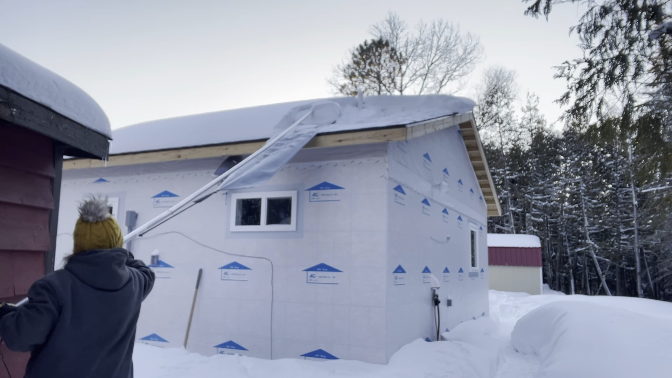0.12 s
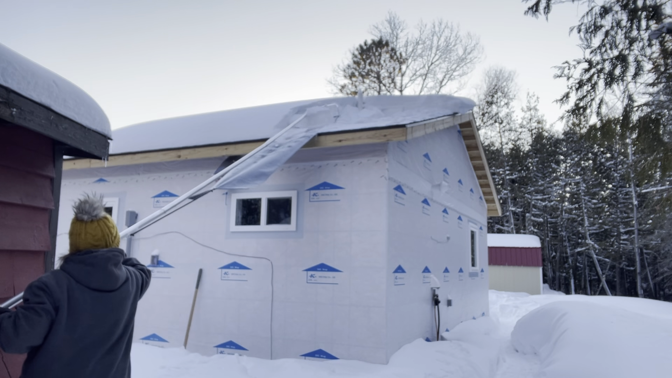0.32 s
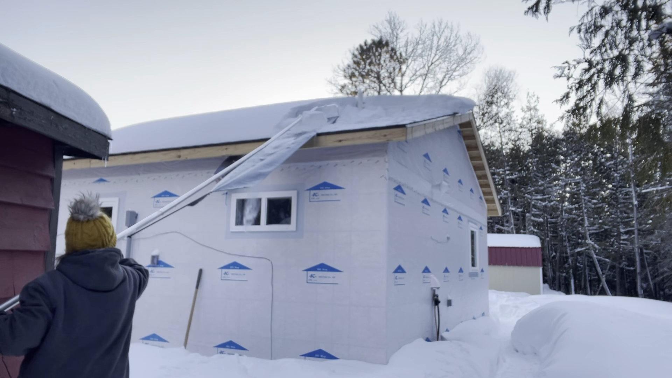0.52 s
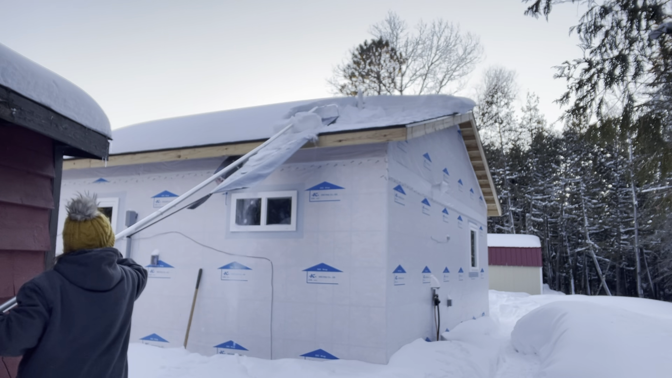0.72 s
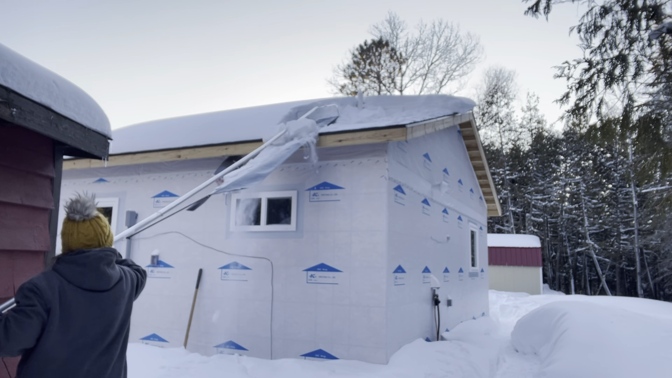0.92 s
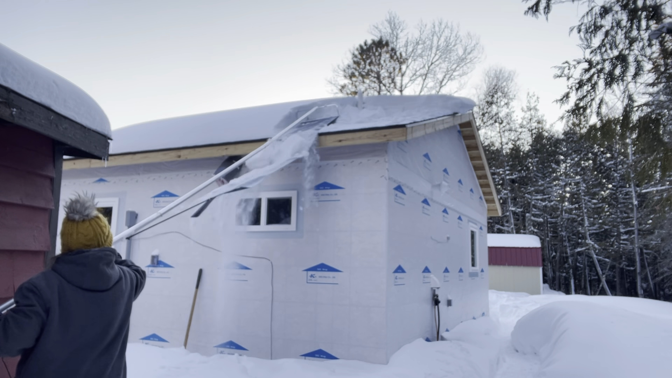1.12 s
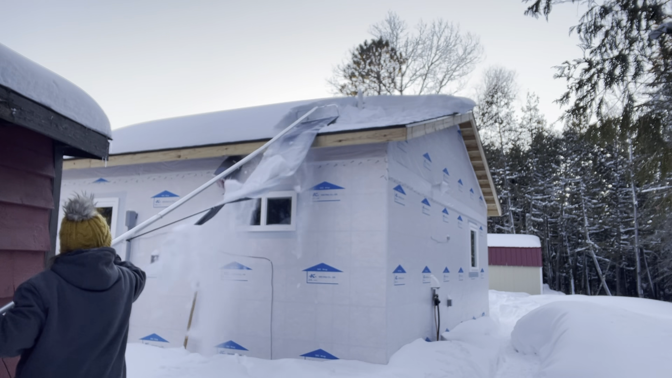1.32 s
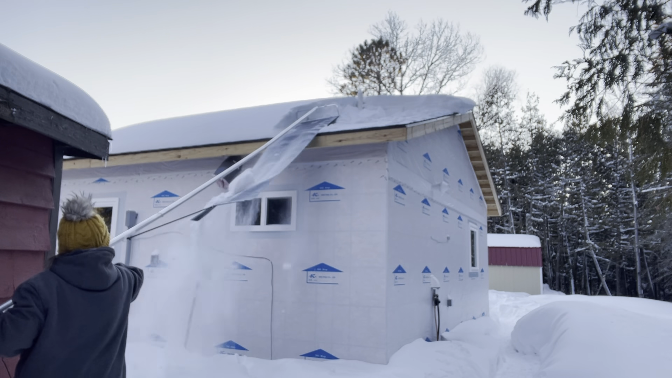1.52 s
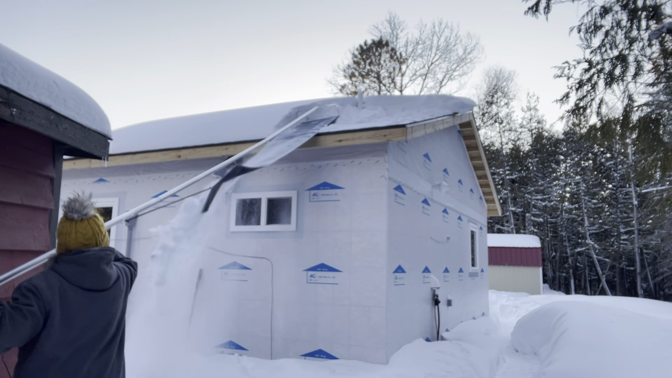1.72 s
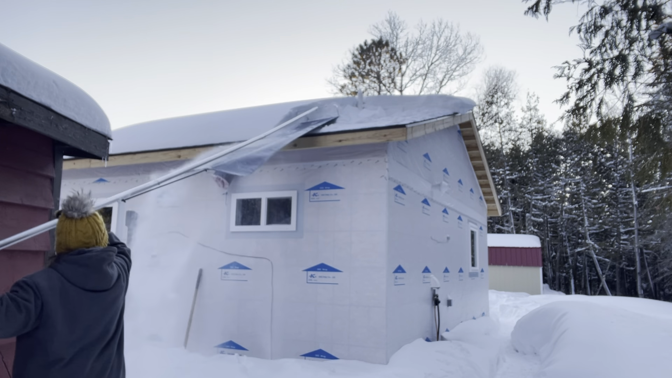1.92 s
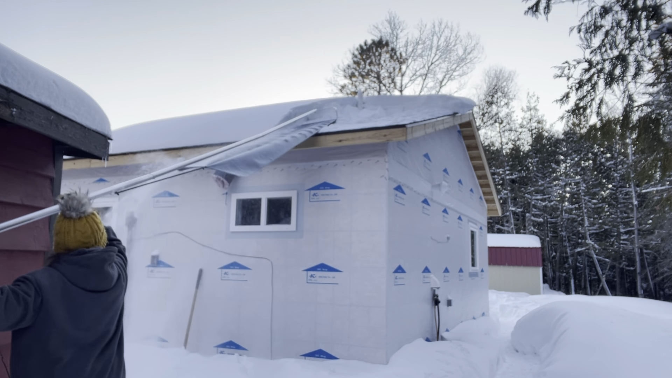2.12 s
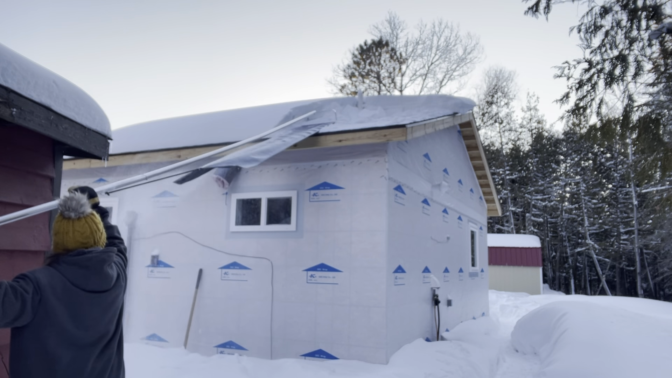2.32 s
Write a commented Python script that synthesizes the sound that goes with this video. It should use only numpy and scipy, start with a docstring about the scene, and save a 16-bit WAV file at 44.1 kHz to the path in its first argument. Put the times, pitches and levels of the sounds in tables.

```python
"""A roof rake clears deep snow in quiet winter air, no echo. The pole knocks and the blade
shears up into the snow with a scraping hiss. From about 1 s the loosened slab rushes down the
plastic tarp in a hiss of powder. Near 1.75 s the unloaded tarp flaps; the pole knocks twice more.
Loose snow pours off the eave and lumps land with low thuds and short crunches, the heaviest
at 2.1 s. The tarp scuffs faintly on the roof."""
import sys
import numpy as np
from scipy import signal
from scipy.fft import rfft, irfft, next_fast_len
from scipy.io import wavfile
from scipy.ndimage import map_coordinates

SR = 44100
rng = np.random.default_rng(int(sys.argv[2]) if len(sys.argv) > 2 else 0)


def wrap_up_sound(samples):
    """Save the sound to the file named by the first command line argument, as 16-bit audio."""
    columns = np.atleast_2d(samples).T
    # keep every value between -1 and 1, then stretch to whole-number steps
    tamed = np.clip(columns, -1, 1)
    steps = np.round(tamed * 32767).astype(np.int16)
    wavfile.write(sys.argv[1], SR, steps)


N = 108045
T = np.arange(N) / SR

# spectra (frequency [Hz], gain [dB])
AIR_TONE = [(20, -33), (45, -14), (110, 3.5), (250, -8), (500, -1), (1000, -19), (4000, -16), (15000, -36)]
POUR_TONE = [(20, -7), (55, -0.5), (130, -4), (260, -6.5), (500, -14.5), (1500, -18), (3500, -38),
             (6000, -18), (15000, -51)]
SCUFF_TONE = [(200, -36), (550, -3), (780, 5.5), (1100, -3), (1500, -8), (2200, -9), (8000, -27)]
FLAP_TONE = [(60, -29), (150, 0.5), (225, -21), (345, 4.5), (480, -6.5), (750, -6.5), (1000, -6),
             (1350, -7), (1800, -12), (2050, -43), (8000, -35)]
CRUNCH_TONE = [(40, -14), (130, -4), (230, -6.5), (430, 3.5), (620, -5.5), (1400, -6.5), (2200, -15.5),
               (3500, -10.5), (5500, -39), (12000, -42)]
POWDER_TONE = [(1000, -27), (3000, -13), (5000, -8.5), (7000, -6.5), (9000, -5), (10500, -1.5), (12300, -2),
               (14500, 1.5), (15800, -0.5)]
SCRAPE_TONE = [(150, -4.5), (320, -3.5), (500, -4), (1400, -1.6), (2500, -3), (4000, -3.5), (5500, -5.5),
               (7500, -12.5), (15000, -25)]
SLIDE_TONE = [(300, -12.5), (600, -1), (780, -2.5), (1050, -2), (1700, -1.5), (2700, -5), (4000, -3.5),
              (6000, -7.5), (8000, -15), (15000, -24)]

# tarp scuffs (time [s], level [dB], width [s])
SCUFFS = [(.378, -47, 0.015), (2.287, -59, 0.022), (2.32, -56, 0.0074)]
# pole knocks (time [s], level [dB], t60 factor set by the grip [1])
KNOCKS = [(0.05, -46.5, 1.3), (1.7644, -33.5, 1.23), (1.979, -36.5, 0.73)]
# pole modes (frequency [Hz], gain [dB], base t60 [s])
POLE_MODES = [(284, -9, 0.1), (337, 4, 0.049), (425, 2, 0.036), (625, -3.5, 0.033), (1010, -8, 0.026)]
# tarp flaps (time [s], level [dB], t60 [s])
FLAPS = [(1.744, -35.5, 0.04), (1.751, -31.5, 0.058), (1.764, -31.5, 0.034)]
# lumps (time [s], thud level [dB], thud frequency [Hz], thud t60 [s],
#        crunch level [dB], crunch rise [s], crunch t60 [s])
LANDINGS = [(1.425, -57, 112, 0.09, -64, 0.012, 0.12), (1.443, -59, 65, 0.14, -67, 0.012, .1),
            (1.595, -54, 61.4, 0.18, -60, 0.011, 0.11), (1.716, -48, 70.5, 0.25, -52, 0.028, 0.17),
            (1.753, -40, 78, 0.13, -51, 0.019, 0.096), (1.789, -48, 60, 0.12, -62, 0.021, 0.31),
            (2.006, -51, 70, 0.27, -76, 0.013, 0.17), (2.058, -44.5, 107, 0.15, -64, .006, 0.11),
            (2.094, -31, 153, 0.038, -49, 0.012, 0.12), (2.105, -20, 60, 0.091, -39.5, 0.028, 0.063),
            (2.14, -37, 90, 0.12, -60, 0.0067, 0.08), (2.154, -42, 154, 0.074, -54, 0.0037, .05),
            (2.174, -37.5, 56, 0.18, -58, 0.0073, 0.14)]

# loose snow envelopes (time [s], relative level [dB])
POUR_LEVEL = [(1.35, -101), (1.58, -66), (1.68, -56.5), (1.78, -56), (1.86, -66), (1.95, -67),
              (2.05, -55.5), (2.18, -55), (2.27, -66.5), (2.34, -72), (2.45, -90)]
POWDER_LEVEL = [(0.0, -50.5), (0.02, -49), (0.13, -52), (0.71, -45), (1.19, -32.5), (1.72, -37),
                (1.81, -45), (2.0, -51.5), (2.45, -58)]
# blade and slab hiss (time [s], level [dB], lower edge [Hz])
SCRAPE_CURVES = [(0, -49.5, 249), (.14, -48.5, 226), (.2, -45.5, 169), (.35, -46.5, 261), (.41, -44.5, 696),
                 (.5, -45, 1160), (.68, -43.5, 1290), (.78, -42.5, 1230), (1.05, -38.5, 980),
                 (1.35, -47, 890), (1.9, -59.5, 600)]
SLIDE_CURVES = [(0, -59.5, 1080), (.6, -47.5, 1200), (.84, -61, 824), (.92, -42.5, 704), (1.04, -42, 556),
                (1.24, -34.5, 500), (1.38, -35.5, 540), (1.46, -36.5, 520), (1.6, -37.5, 515),
                (1.69, -40, 380), (1.76, -44.5, 300), (1.82, -50.5, 404), (1.9, -55.5, 600),
                (2.05, -59, 766), (2.24, -67.5, 600), (2.33, -63, 550), (2.45, -88, 550)]
# floor below the edge (frequency [Hz], gain [dB])
SCRAPE_FLOOR = [(40, -43), (150, -16.5), (350, -13.5), (650, -7), (950, -5)]
SLIDE_FLOOR = [(40, -44), (220, -29), (330, -8), (450, -28.5)]
# stereo width (frequency [Hz], side over mid [dB])
SCRAPE_WIDTH = [(200, -9.5), (700, -7.5), (1500, -16.5), (4000, -24), (7000, 1)]
SLIDE_WIDTH = [(300, -17), (800, -7.5), (1500, -15), (2800, -3), (6000, -23)]
# hollow resonance, moving as the rake travels (time [s], centre [Hz])
SCRAPE_RESONANCE = [(0, 1190), (.22, 720), (.37, 794), (.5, 1350), (.7, 1460), (.9, 1290), (1.1, 1140)]
SLIDE_RESONANCE = [(.95, 1040), (1.15, 1120), (1.38, 980), (1.55, 1130), (1.68, 1380)]

GROUND_LEAD_S = 0.00035  # snow lands to the left


def amp(db):
    """Decibels to gain."""
    return 10 ** (np.asarray(db) / 20)


def unit(x):
    """Scale to rms 1."""
    return x / np.sqrt(np.mean(x ** 2) + 1e-20)


def along(points, hz):
    """Interpolate (frequency [Hz], value) on a log axis."""
    knots_hz, values = np.transpose(points)
    return np.interp(np.log(hz + 1), np.log(knots_hz + 1), values)


def curves(rows):
    """Per-sample curve of each column after the time."""
    times_s, *columns = np.transpose(rows)
    return [np.interp(T, times_s, column) for column in columns]


def wobble(rate_hz):
    """Smooth random curve, rate_hz knots a second."""
    return map_coordinates(rng.standard_normal(int(N * rate_hz / SR) + 4), [T * rate_hz])


def filtered(x, response):
    """Apply a complex frequency response."""
    size = next_fast_len(N + SR // 2)
    return irfft(rfft(x, size) * response(np.fft.rfftfreq(size, 1 / SR)), size)[..., :N]


def placed(x, lead_s, left_db):
    """Pan by the left channel's lead and gain over the right."""
    half = np.array([[.5], [-.5]])
    return amp(half * left_db) * filtered(x, lambda hz: np.exp(2j * np.pi * hz * half * lead_s))


def grains(tone, side_db, grain_db):
    """Noise of countless tiny, uneven contacts; side_db: number or table. Stereo, rms 1."""
    size = amp(grain_db * wobble(2000))
    mid, side = filtered(size * rng.standard_normal((2, N)), lambda hz: amp(along(tone, hz)))
    side = filtered(side, lambda hz: amp(along(side_db, hz) if np.ndim(side_db) else side_db))
    return unit(np.array([mid + side, mid - side]))


def edged(x, edge_hz, floor, order=39):
    """Steep moving high-pass with a floor below its edge; rms 1."""
    hz, frames_s, spectra = signal.stft(x, SR, nperseg=1024)
    above = 1 / (1 + (np.interp(frames_s, T, edge_hz) / (hz[:, None] + 1)) ** order)
    gain = above + amp(along(floor, hz))[:, None] * (1 - above)
    return unit(signal.istft(spectra * gain, SR, nperseg=1024)[1][:, :N])


def hollowed(x, resonance, peak_db, dip_db, width_oct, dip_ratio=0.773):
    """Moving resonance with a dip below it; rms 1."""
    hz, frames_s, spectra = signal.stft(x, SR, nperseg=1024)
    centre_hz = np.interp(frames_s, *np.transpose(resonance))
    bump = lambda at_hz: np.exp(-.5 * (np.log2((hz[:, None] + 1) / at_hz) / width_oct) ** 2)
    gain = amp(peak_db * bump(centre_hz) + dip_db * bump(dip_ratio * centre_hz))
    return unit(signal.istft(spectra * gain, SR, nperseg=1024)[1][:, :N])


def air(level_db=-72):
    """Faint, low outdoor noise."""
    return grains(AIR_TONE, side_db=-4.5, grain_db=-6) * amp(level_db + 0.87 * wobble(7.9))


def pour():
    """Loose snow patters onto the ground with a soft rumble."""
    level_db, = curves(POUR_LEVEL)
    patter = grains(POUR_TONE, side_db=-13, grain_db=5) * amp(level_db + 1.2 * wobble(35.8))
    return placed(patter, GROUND_LEAD_S, left_db=1)


def scuffs():
    """The tarp drags briefly on the roof."""
    swell = sum(amp(db) * np.exp(-.5 * ((T - at_s) / width_s) ** 2) for at_s, db, width_s in SCUFFS)
    return placed(swell * grains(SCUFF_TONE, side_db=-10, grain_db=3.5), lead_s=0.0003, left_db=4.5)


def pole(rise_s=0.0016):
    """Knocks ring the long handle's damped modes: dull, hollow."""
    knocks = np.zeros(N)
    for start_s, knock_db, grip in KNOCKS:
        t = np.maximum(T - start_s, 0)
        attack = 1 - np.exp(-t / rise_s)
        for hz, mode_db, t60_s in POLE_MODES:
            level_db = knock_db + mode_db + rng.normal(0, 1)
            knocks += attack * amp(level_db - 60 * t / (t60_s * grip)) * np.sin(2 * np.pi * hz * t)
    return placed(knocks, lead_s=0.00068, left_db=3)


def flaps(rise_s=0.0023):
    """Freed of its load, the tarp flaps in a quick cluster."""
    swell = np.zeros(N)
    for start_s, level_db, t60_s in FLAPS:
        t = np.maximum(T - start_s, 0)
        swell += amp(level_db - 60 * t / t60_s) * (1 - np.exp(-t / rise_s))
    return placed(swell * grains(FLAP_TONE, side_db=-7, grain_db=-1.5), lead_s=0, left_db=0.5)


def landings(thud_rise_s=0.00076):
    """Each lump gives a low damped thud and a crunch as it packs down."""
    thuds, packing = np.zeros(N), np.zeros(N)
    for start_s, thud_db, thud_hz, thud_t60_s, crunch_db, crunch_rise_s, crunch_t60_s in LANDINGS:
        t = np.maximum(T - start_s, 0)
        envelope = amp(thud_db - 60 * t / thud_t60_s) * (1 - np.exp(-t / thud_rise_s))
        thuds += envelope * np.sin(2 * np.pi * thud_hz * t)
        decay_db = 60 * np.maximum(t - crunch_rise_s, 0) / crunch_t60_s
        packing += amp(crunch_db - decay_db) * np.minimum(t / crunch_rise_s, 1)
    crunch = packing * grains(CRUNCH_TONE, side_db=-4, grain_db=1.5)
    return placed(thuds + crunch, GROUND_LEAD_S, left_db=2)


def powder(gain_db=4):
    """Dry crystals run over the tarp: bright, smooth hiss."""
    level_db, = curves(POWDER_LEVEL)
    hiss = placed(grains(POWDER_TONE, side_db=-20, grain_db=0), lead_s=0.000083, left_db=-0.4)
    return hiss * amp(level_db + gain_db + 0.56 * wobble(58.45))


def scrape():
    """The blade shears snow; the hiss's lower edge climbs as it goes up the roof."""
    level_db, edge_hz = curves(SCRAPE_CURVES)
    hiss = edged(grains(SCRAPE_TONE, SCRAPE_WIDTH, grain_db=1.3), edge_hz, SCRAPE_FLOOR)
    hiss = hollowed(hiss, SCRAPE_RESONANCE, peak_db=2, dip_db=-1, width_oct=0.062)
    return hiss * amp(level_db + 1.1 * wobble(24.46))


def slide():
    """The slab runs down the tarp: a broad rush, deepening toward the eave."""
    level_db, edge_hz = curves(SLIDE_CURVES)
    rush = edged(grains(SLIDE_TONE, SLIDE_WIDTH, grain_db=0.5), edge_hz, SLIDE_FLOOR)
    rush = hollowed(rush, SLIDE_RESONANCE, peak_db=3.5, dip_db=-0.5, width_oct=0.12)
    return placed(rush, lead_s=0.000015, left_db=0) * amp(level_db + 0.79 * wobble(31.25))


def scene():
    """Stereo sum of all sources."""
    return air() + scrape() + slide() + powder() + pour() + flaps() + landings() + pole() + scuffs()


def record(dry):
    """Bass roll-off and hard treble limit."""
    low_cut_hz, top_hz = 31, 15850
    highpass = signal.butter(2, low_cut_hz, "highpass", fs=SR, output="sos")
    return filtered(signal.sosfilt(highpass, dry), lambda hz: hz < top_hz)


dry = scene()
out = record(dry)
wrap_up_sound(out)
```